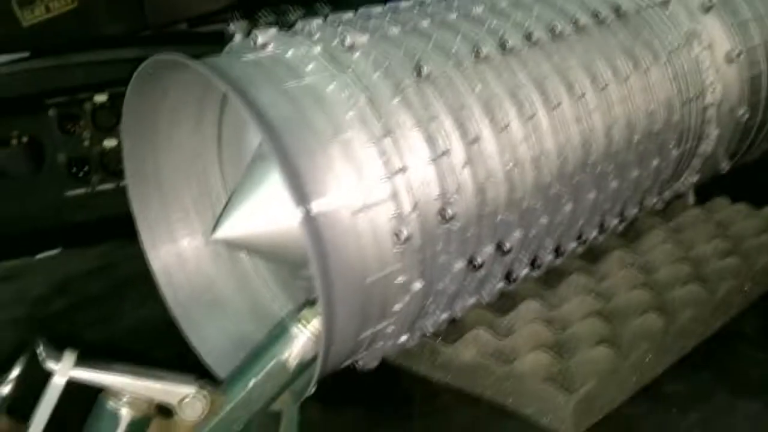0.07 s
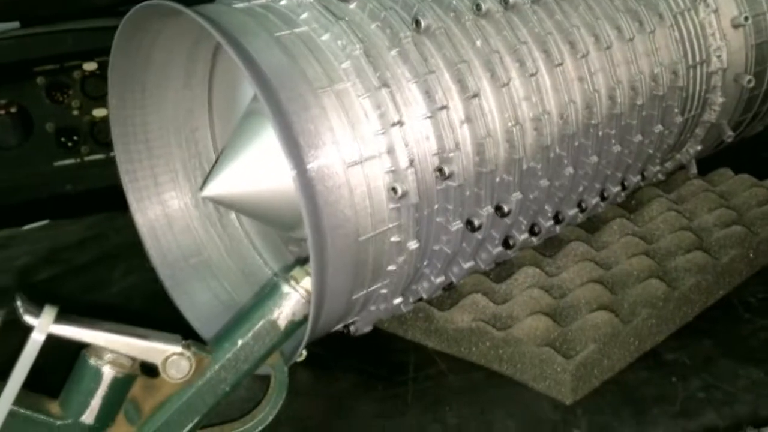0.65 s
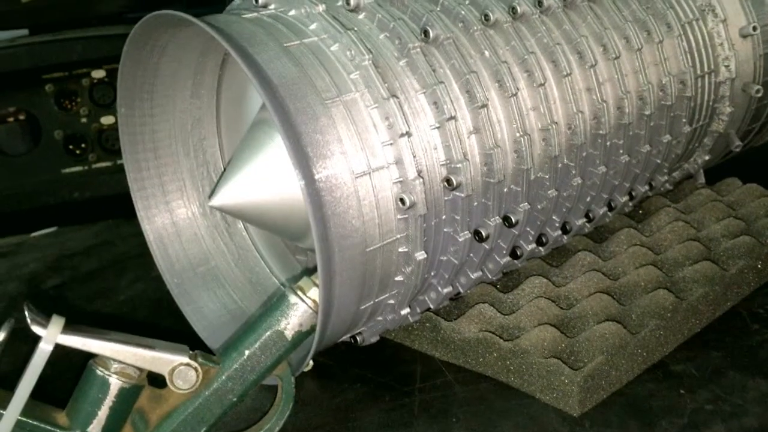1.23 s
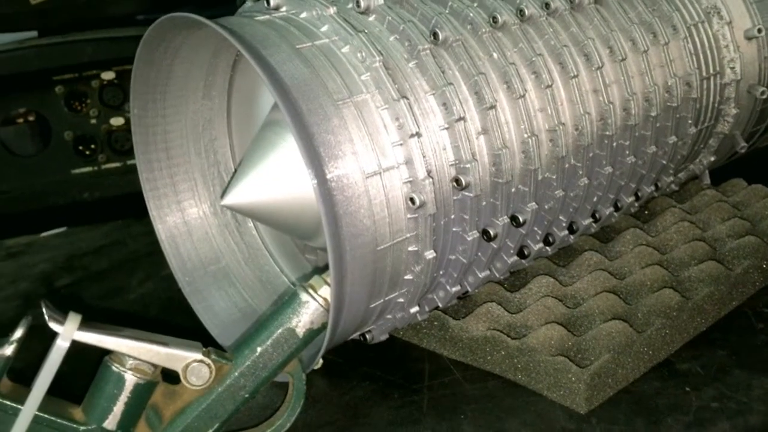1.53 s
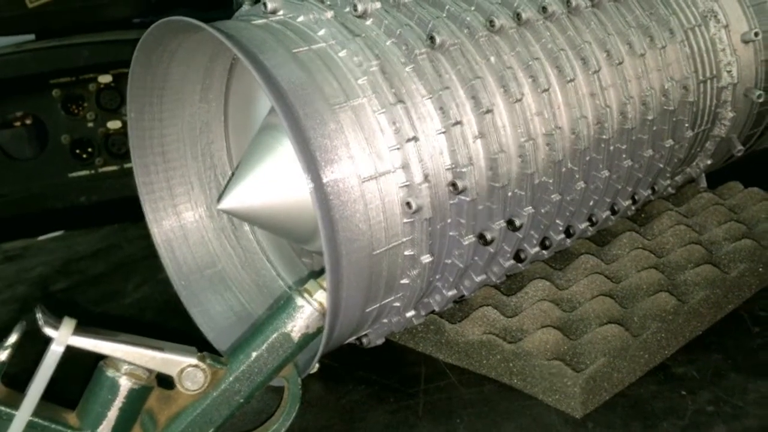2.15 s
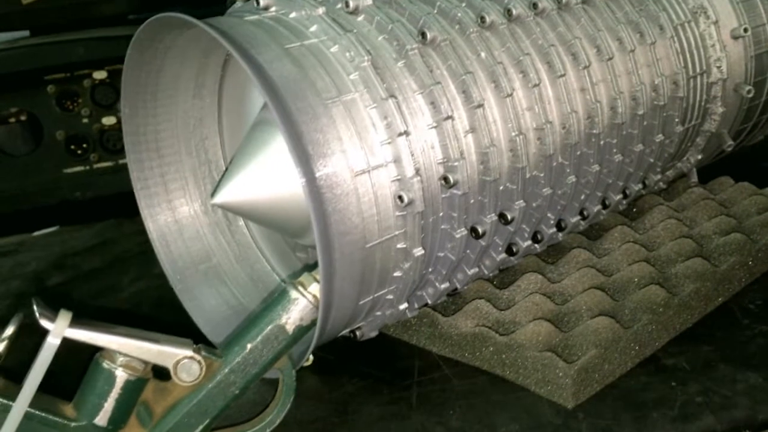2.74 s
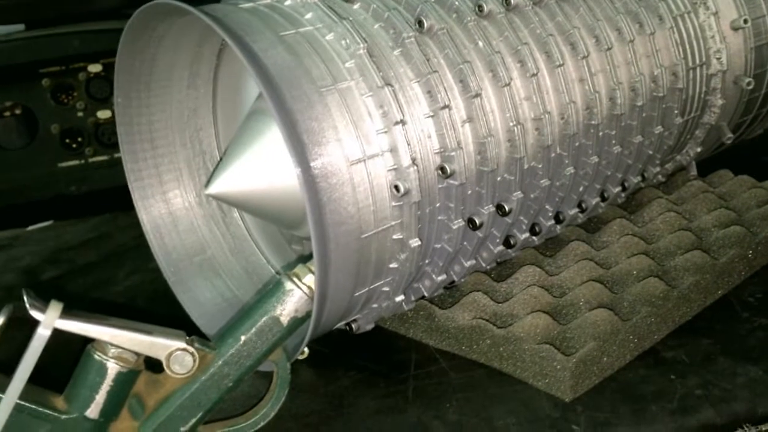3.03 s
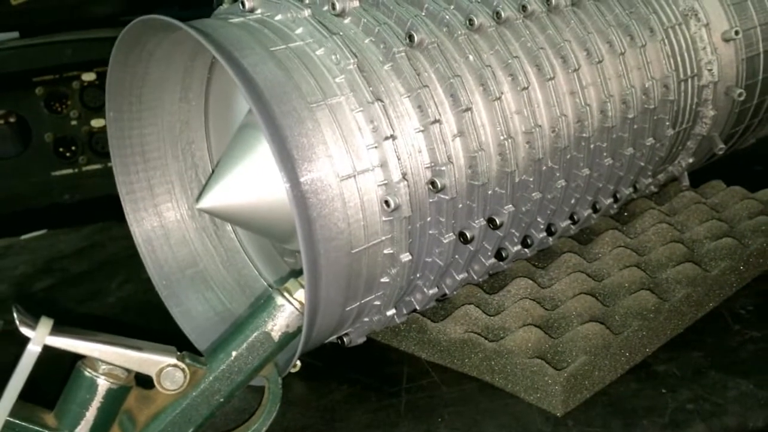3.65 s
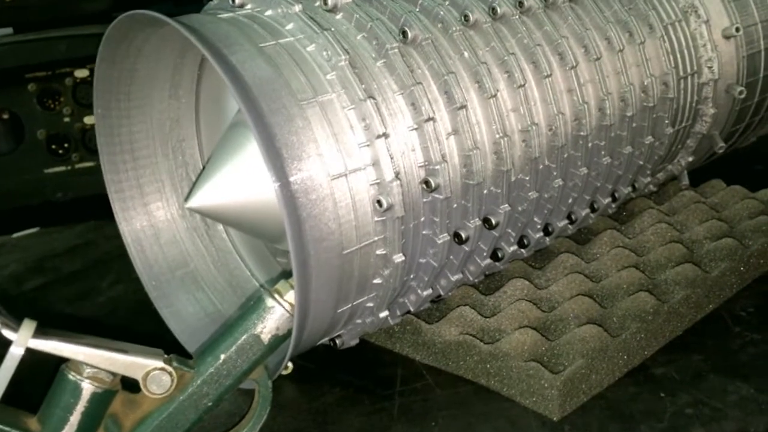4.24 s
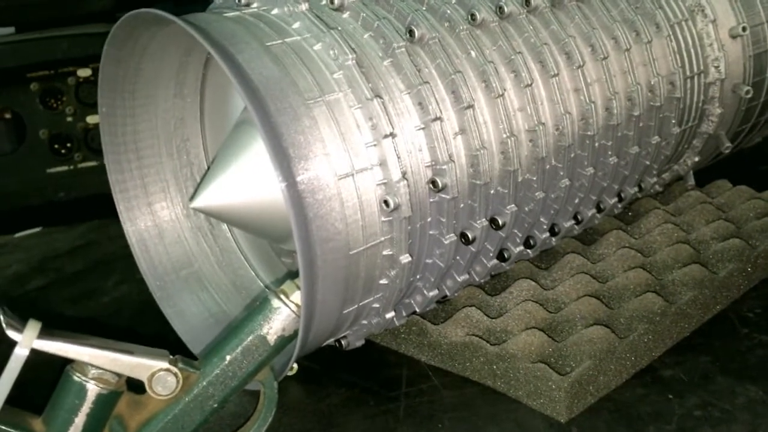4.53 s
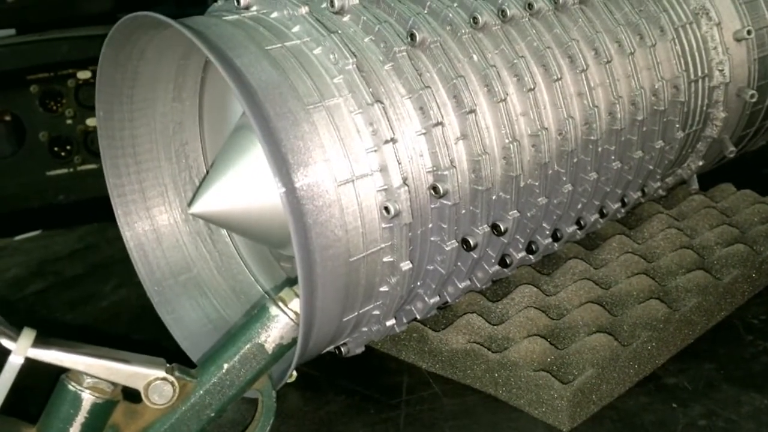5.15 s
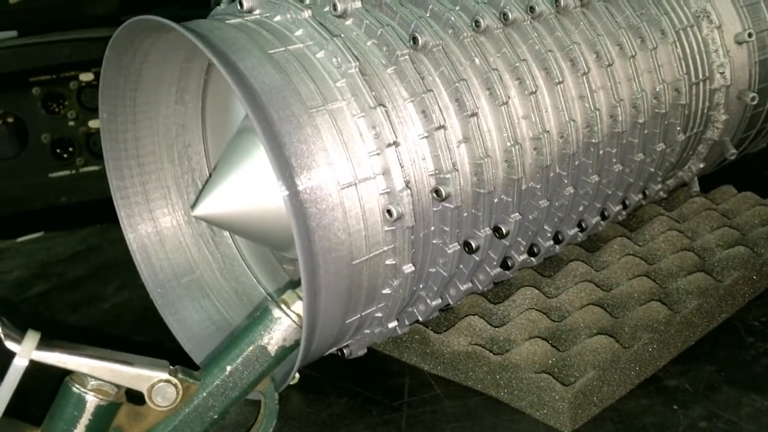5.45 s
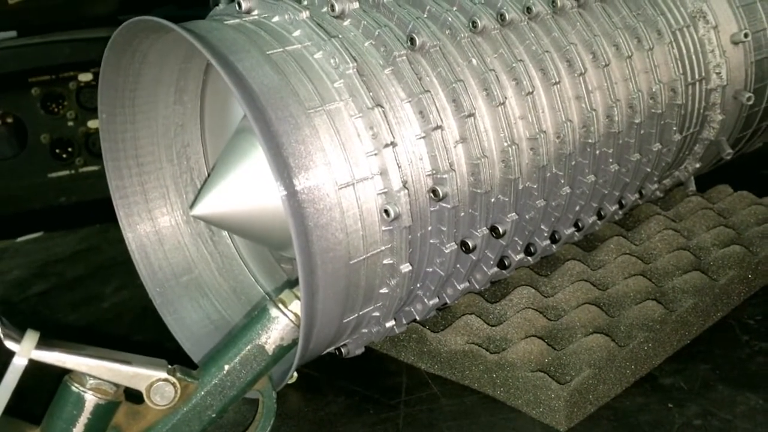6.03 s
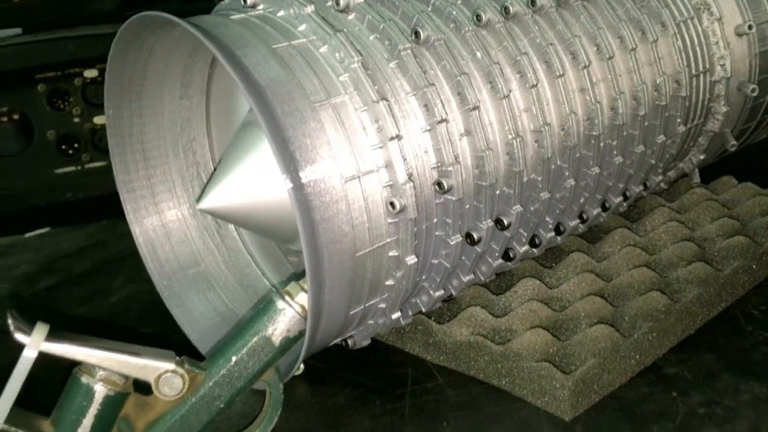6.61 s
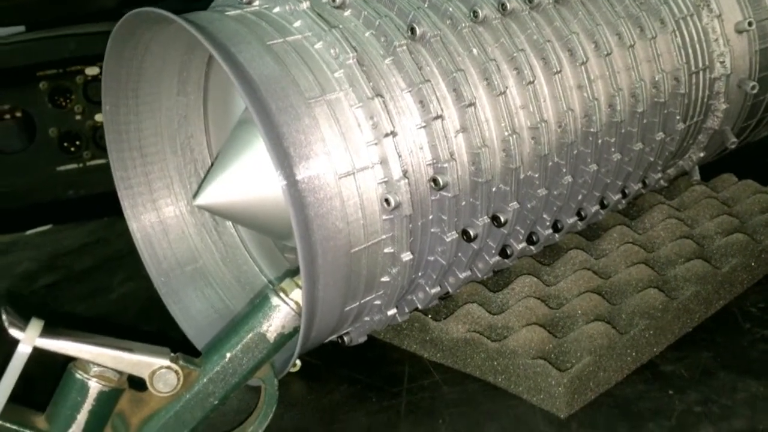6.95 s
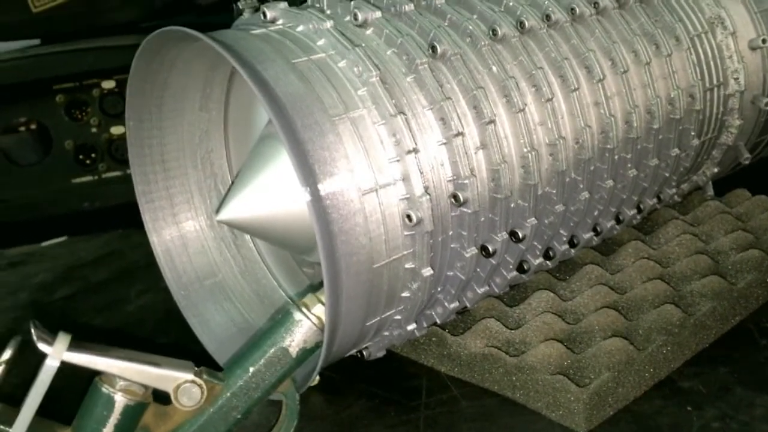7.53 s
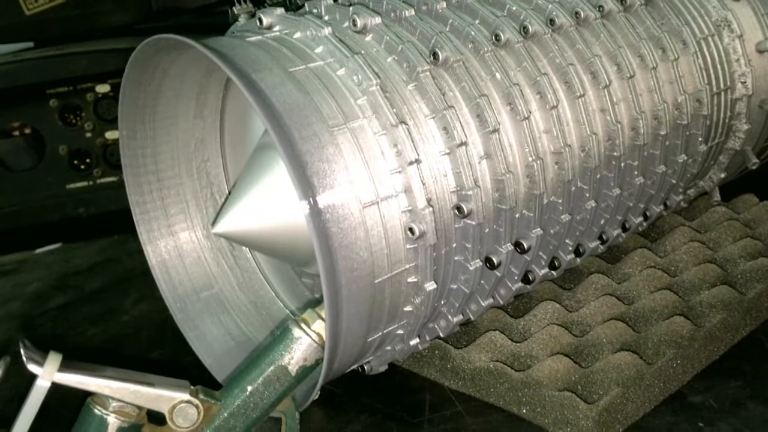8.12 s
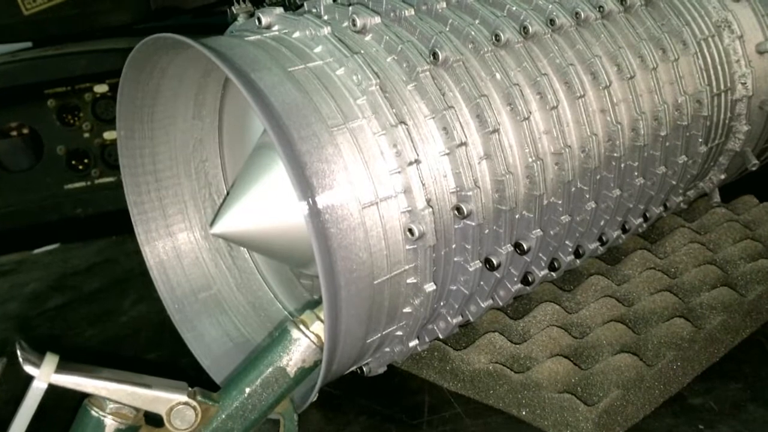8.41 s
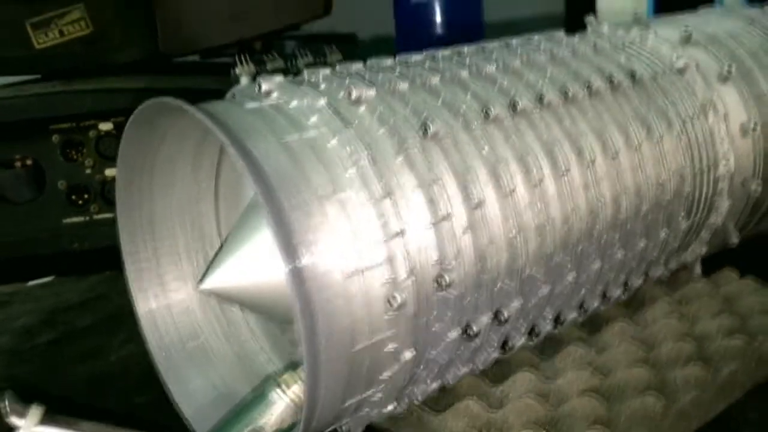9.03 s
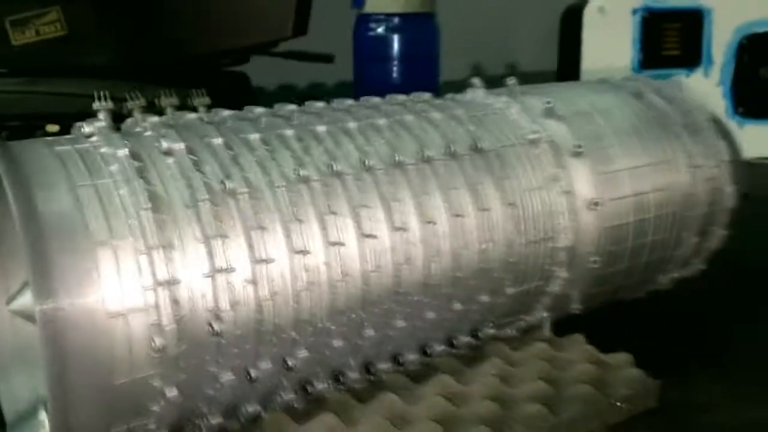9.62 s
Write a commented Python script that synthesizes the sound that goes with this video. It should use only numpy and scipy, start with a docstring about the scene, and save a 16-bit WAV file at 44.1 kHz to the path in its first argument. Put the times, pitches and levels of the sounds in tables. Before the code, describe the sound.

From the start, an air gun hisses brightly and continuously into a small metal turbine, heard close with faint workshop reverberation. The rotor gives a high, slightly rough whine, with thinner overtones swelling and fading. Its pitch holds for a second, rises a little until 3.5 seconds, sags until about 4.8, then climbs steadily, levelling off near the end almost an octave above where it began. Air spilling from the intake buffets the microphone: a few soft pops around 1 second, then a lumpy low roar with dull thumps from 1.5 to 2.5, dying away by 3.5. The buffeting returns with more pops around 5.5 seconds and settles into a stronger, more even roar. At about 9.3 seconds the roar drops away with a last dull pop, and the hiss shifts slightly in colour while the whine carries on to the end, near 10 seconds.

```python
"""A workshop bench: an air gun blows into the intake of a small aluminium turbine.
The rotor's bladed stages whine, rise a little, sag and then climb in pitch; their higher tones swell
as they glide through casing resonances. The jet hisses through the duct, changing colour as the close
microphone swings to the side. Air spilling from the intake buffets it with a lumpy roar and dull pops."""
import sys
import numpy as np
from scipy import signal
from scipy.fft import rfft, irfft
from scipy.io import wavfile

SR = 44100
rng = np.random.default_rng(int(sys.argv[2]) if len(sys.argv) > 2 else 0)


def wav_record(signal):
    """Record a signal, one row per channel, as 16-bit PCM in the file named by sys.argv[1]."""
    frames = np.transpose(np.atleast_2d(signal))
    bounded = np.clip(frames, -1, 1)
    # unit amplitude maps onto the largest positive 16-bit level
    quanta = np.round(bounded * 32767).astype(np.int16)
    wavfile.write(sys.argv[1], SR, quanta)


N = 435266
BLADES = 12   # first stage


def from_db(db):
    """Decibels to gain."""
    return 10 ** (np.asarray(db) / 20)


def unit_rms(x):
    """Scale to unit power."""
    return x / np.sqrt(np.mean(x ** 2) + 1e-20)


def soft_step(x):
    """Smooth rise from 0 to 1 as x passes zero."""
    return .5 + .5 * np.tanh(x / 2)


def curve(rows):
    """Straight lines through (seconds, value) rows, at every sample."""
    return np.interp(np.arange(N) / SR, *np.transpose(rows))


def spline(rows):
    """Natural cubic spline through (seconds, value) rows, at every sample."""
    knots_s, values = np.transpose(rows)

    def terms(t):
        return np.column_stack([np.abs(t[:, None] - knots_s) ** 3, np.ones_like(t), t])

    straight_ends = np.column_stack([[np.ones_like(knots_s), knots_s], np.zeros((2, 2))])
    weights = np.linalg.solve(np.vstack([terms(knots_s), straight_ends]), np.append(values, [0, 0]))
    grid_s = np.linspace(0, N / SR, 2000)
    return np.interp(np.arange(N) / SR, grid_s, terms(grid_s) @ weights)


def drift(rate_hz):
    """Smooth random wander of unit spread."""
    pole = np.exp(-2 * np.pi * rate_hz * 20 / SR)   # one step per 20 samples
    noise = rng.standard_normal(N // 20 + 4002)
    slow = signal.lfilter([1], [1, -2 * pole, pole * pole], noise)[4000:]
    return np.interp(np.arange(N) / 20, np.arange(len(slow)), unit_rms(slow))


def at_hz(rows, hz):
    """Read (Hz, value) rows on a log-frequency axis."""
    knots_hz, values = np.transpose(rows)
    return np.interp(np.log(np.maximum(hz, 1)), np.log(knots_hz), values)


def peaks_db(resonances, hz):
    """Summed gain of bell-shaped peaks and notches."""
    return sum(db / (1 + (2 * (hz - centre) / width) ** 2) for centre, width, db in resonances)


def response(colour, resonances=(), size=4096):
    """Minimum-phase impulse response of a smooth spectrum with peaks and notches."""
    hz = np.arange(size // 2 + 1) * SR / size
    gain = from_db(at_hz(colour, hz) + peaks_db(resonances, hz))
    cepstrum = irfft(np.log(gain))
    cepstrum[1:size // 2] *= 2
    cepstrum[size // 2 + 1:] = 0
    return irfft(np.exp(rfft(cepstrum)))


def through(x, impulse):
    """Convolve, keeping N samples."""
    return signal.fftconvolve(x, impulse)[:N]


def butter(x, hz, kind, order=2):
    """Causal Butterworth filter."""
    return signal.sosfilt(signal.butter(order, hz, kind, fs=SR, output="sos"), x)


def low_shelf(x, db, corner_hz):
    """Raise or lower everything under the corner."""
    return x + (from_db(db) - 1) * butter(x, corner_hz, "low", order=1)


# Rotor speed. Each row: time in seconds, first-stage blade-passing rate in Hz.
BLADE_RATE_HZ = [(0.0, 1067.84), (0.97, 1079.96), (1.91, 1209.28), (2.23, 1275.86), (2.89, 1332.73),
                 (3.54, 1340.09), (4.05, 1275.43), (4.31, 1241.19), (4.82, 1191.22), (6.2, 1372.74),
                 (6.44, 1427.22), (6.71, 1498.66), (8.1, 1765.36), (8.82, 1839.37), (9.02, 1855.47),
                 (9.87, 1902.57)]
# Air spilling from the intake. Each row: time in seconds, relative level in dB.
SPILL_DB = [(0.0, -42), (0.39, -42.5), (1.28, -33.1), (1.66, -23), (2.2, -22), (2.44, -27), (2.59, -32),
            (2.74, -30.5), (3.31, -33.5), (3.76, -44), (4.74, -43), (5.63, -19.0), (5.98, -20),
            (6.13, -18.5), (8.79, -17.5), (9.3, -21.5), (9.51, -30.5), (9.87, -32)]


def airflow(strong_db=-32.5, spread_db=2.5, stall_below_hz=1396, spread_hz=93):
    """The heavy rotor changes speed smoothly; strong spill is ragged in stall, even once up to speed."""
    blade_hz = spline(BLADE_RATE_HZ)
    spill_db = curve(SPILL_DB)
    strong = soft_step((spill_db - strong_db) / spread_db)
    stall = strong * soft_step((stall_below_hz - blade_hz) / spread_hz)
    even = strong - stall
    return blade_hz / BLADES, spill_db, stall, even


def blade_tone(hz, waver, waver_hz=32):
    """A blade row's tone, scattered in level and phase by turbulent air."""
    phase = 2 * np.pi * np.cumsum(hz) / SR + rng.uniform(0, 2 * np.pi)
    in_phase = (1 + waver * drift(waver_hz)) * np.cos(phase)
    quadrature = waver * drift(waver_hz) * np.sin(phase)
    return np.sqrt(2) * (in_phase + quadrature)


# Casing resonances and notches. Each row: centre in Hz, width in Hz, gain in dB.
CASING_PEAKS = [(1590, 485, -20), (1808, 120, 8.5), (2280, 180, 5), (2920, 150, -10.5), (3017, 135, 13),
                (3195, 39, -12), (3520, 200, 8), (3777, 95, 5.5), (4240, 94, 12), (4804, 98, 8),
                (5610, 810, 3.5), (6110, 140, 6), (7640, 110, 10), (9480, 200, 3)]


def casing_tone(hz, level_db, waver, wander_db=0.72, wander_hz=3):
    """A higher blade tone swells and dips as it glides through the casing's resonances."""
    grid_hz = np.arange(0, SR / 2, 5)
    casing_db = np.interp(hz, grid_hz, peaks_db(CASING_PEAKS, grid_hz))
    gain = from_db(level_db + casing_db + wander_db * drift(wander_hz))
    return gain * blade_tone(hz, 1.4 * waver)


# Bite of the jet on the first stage. Each row: time in seconds, relative whine level in dB.
BITE_DB = [(0.0, -24.5), (1.29, -28.5), (1.46, -25.5), (1.81, -33), (2.67, -25.5), (3.3, -30), (4.37, -25),
           (4.57, -29), (4.92, -25), (5.96, -27), (6.22, -33), (6.71, -33.0), (7.36, -25), (7.94, -26.5),
           (8.67, -23.5), (9.87, -25.5)]
# First-stage overtones. Each row: harmonic, relative level in dB, dB gained per dB of deep drive above 0.
FIRST_STAGE_OVERTONES = [(2, -37, 0.24), (3, -44, 0.86), (4, -47.5, 0.2), (5, -49.5, -0.1)]
# Drive of the deeper stages. Each row: time in seconds, gain in dB.
DEEP_DRIVE_DB = [(0.0, 3), (0.7, 3.5), (2.1, -4.2), (3.4, 4.2), (4.2, 6.5), (4.8, 7.5), (5.3, 1.7),
                 (6.2, -10), (9.87, -9.5)]
# Tones of the deeper stages. Each row: cycles per shaft turn, relative level in dB.
DEEP_TONES = [(18, -34.5), (20, -40.5), (22, -42.5), (22.5, -43.5), (23, -43.5), (25, -41), (26, -37),
              (40, -56)]


def rotor(shaft_hz, spill_db, stall, gain_db=2.0, bite_db_per_db=0.44, spill_loss_db_per_db=0.081):
    """Bladed stages whine, locked to one shaft; spill roughens them and weakens the overtones."""
    bite_db, deep_db = curve(BITE_DB), curve(DEEP_DRIVE_DB)
    gust_db = spill_db - spill_db.max()
    waver = 0.145 + 0.08 * np.sqrt(from_db(gust_db)) + 0.08 * stall
    blade_hz = BLADES * shaft_hz
    fundamental = from_db(bite_db) * blade_tone(blade_hz, waver)
    overtones = sum(casing_tone(harmonic * blade_hz, db + slope * np.maximum(deep_db, 0), waver)
                    for harmonic, db, slope in FIRST_STAGE_OVERTONES)
    overtone_db = bite_db_per_db * (bite_db - bite_db.mean()) - spill_loss_db_per_db * gust_db
    deep = sum(casing_tone(per_turn * shaft_hz, db, waver) for per_turn, db in DEEP_TONES)
    return from_db(gain_db) * (fundamental + from_db(overtone_db) * overtones + from_db(deep_db) * deep)


# Workshop decay. Each row: frequency in Hz, time to fall 60 dB in seconds.
ROOM_T60_S = [(300, 1), (1500, 0.92), (8000, 0.043)]


def workshop(x, gain_db=-24):
    """A faint diffuse tail, one second long, that dies sooner in the treble."""
    t = np.arange(SR) / SR
    edges_hz = np.geomspace(200, 12800, 7)
    tail = 0
    for low, high in zip(edges_hz, edges_hz[1:]):
        decay = from_db(-60 * t / at_hz(ROOM_T60_S, np.sqrt(low * high)))
        tail = tail + decay * butter(rng.standard_normal(SR), [low, high], "band")
    return from_db(gain_db) * through(x, tail / np.sqrt(np.sum(tail ** 2)))


# Jet strength. Each row: time in seconds, relative level in dB.
JET_DB = [(0.0, -29), (0.08, -29), (1.4, -29.5), (1.92, -32), (3.41, -29.5), (3.55, -30.5), (5.31, -27.5),
          (6.27, -32.5), (8.6, -32.5), (9.81, -33), (9.87, -30)]
# Jet spectrum. Each row: frequency in Hz, relative density in dB.
JET_SPECTRUM_DB = [(40.0, -9), (90.0, -14), (300.0, -22.5), (700.0, -9), (1200.0, -1.5), (2500.0, 1),
                   (4200.0, 1.3), (6500.0, 2.15), (10000.0, -1), (11500.0, -9), (14000.0, -9.5),
                   (15600.0, -11)]
# Intake duct resonances and notches. Each row: centre in Hz, width in Hz, gain in dB.
DUCT_PEAKS = [(902, 140, 4), (1410, 71, -2), (3320, 160, 1), (3435, 68, 6.5), (4285, 106, 7),
              (5330, 129.5, 0), (5800, 249.6, -2.5), (6150, 200, 4.5), (7190, 280, -13.5), (8540, 130, 3.5),
              (9300, 240, -3), (9160, 235.5, 5), (10120, 450, 6), (11000, 195.8, 6.5), (11100, 383.3, -0.5),
              (11950, 530, 7.5), (12546.5, 222.1, 5.5), (14100, 719.1, 6)]
# Extra peaks and notches at the side. Each row: centre in Hz, width in Hz, gain in dB.
SIDE_PEAKS = [(4300, 430, -2.5), (6400, 770, -6), (8300, 700, 4.5), (10200, 1300, -8), (13400, 1200, 3),
              (14500, 600, -4)]
# Microphone swing. Each row: time in seconds, position from 0 (intake) to 1 (side).
MIC_SWING = [(0, 0.1), (6, 0), (9, 0.43), (9.45, 0.9), (9.87, 1)]


def jet(stall, steady_roar, gain_db=5.0):
    """Hiss coloured by the duct and the microphone's position; fuller in stall."""
    noise = rng.standard_normal(N)
    ahead = unit_rms(through(noise, response(JET_SPECTRUM_DB, DUCT_PEAKS)))
    beside = unit_rms(through(noise, response(JET_SPECTRUM_DB, [*DUCT_PEAKS, *SIDE_PEAKS])))
    swing = curve(MIC_SWING)
    hiss = (1 - swing) * ahead + swing * beside
    lower_band_db = 0.84 + 5 * stall - 2 * steady_roar   # turned down under the steady wind roar
    return from_db(curve(JET_DB) + gain_db) * low_shelf(hiss, lower_band_db, corner_hz=4500)


# Spill on the microphone. Each row: frequency in Hz, relative density in dB.
SPILL_SPECTRUM_DB = [(25, -22), (45, -15.5), (80, -2.5), (140, -1), (240, -2), (330, 0.5), (480, -0.5),
                     (680, -3.5), (1200, -4.5), (2400, -7.5), (4000, -11), (6500, -18.5), (10000, -24.5),
                     (15000, -34.5)]


def buffeting(spill_db, stall, even, lump_db=1.74, lump_hz=110):
    """Small eddies roar on the microphone port; stall adds bass and more patter from larger ones."""
    lumpy_noise = from_db(lump_db * drift(lump_hz)) * rng.standard_normal(N)
    roar = unit_rms(through(lumpy_noise, response(SPILL_SPECTRUM_DB)))
    patter_share = 0.1 + 0.29 * stall
    wind = np.sqrt(1 - patter_share) * roar + np.sqrt(patter_share) * patter()
    bass_db = -0.5 + 8 * stall - 6.5 * even
    return from_db(spill_db + 1.27 - 2 * stall) * low_shelf(wind, bass_db, corner_hz=120)


def eddy(soft_hz=1300, port_hz=60, lag_hz=400):
    """One soft pressure kick whose lows trail its highs; peak 1."""
    kick = butter(response(SPILL_SPECTRUM_DB), soft_hz, "low", order=1)
    kick = butter(kick, port_hz, "high", order=1)
    pole = np.exp(-2 * np.pi * lag_hz / SR)
    for _ in range(2):
        kick = signal.lfilter([-pole, 1], [1, -pole], kick)   # all-pass
    return kick / np.abs(kick).max()


def patter(eddies_per_s=60, spread_db=9, count=2000):
    """Eddies of random size, shed one after another at uneven intervals."""
    gaps_s = rng.uniform(.1, 1.9, count) / eddies_per_s
    sizes = from_db(rng.uniform(-spread_db, spread_db, count)) * rng.choice([-1, 1], count)
    starts = (np.cumsum(gaps_s) * SR).astype(int)
    hits = np.zeros(N)
    hits[starts[starts < N]] = sizes[starts < N]
    return unit_rms(through(hits, eddy()))


# Biggest eddies. Each row: start in seconds, relative peak in dB.
POP_PEAKS_DB = [(0.701, -20), (.995, -16), (1.199, -18), (1.363, -17), (1.538, -2.5), (1.571, -6.5),
                (1.627, -11), (1.663, -8), (1.720, -6), (1.793, -7), (1.865, -6), (1.875, -5), (1.929, -5),
                (2.048, -6), (2.247, -8), (2.423, -7), (2.755, -10.5), (2.915, -12.5), (5.451, -4),
                (5.480, -3.5), (5.512, -5.5), (5.639, -8), (5.73, -5), (8.730, -7), (9.406, -10)]


def pops(gain_db=-2.0):
    """The biggest eddies hit the microphone port and thump out of the roar."""
    hits = np.zeros(N)
    for start_s, db in POP_PEAKS_DB:
        hits[round(start_s * SR)] = from_db(db + gain_db) * rng.choice([-1, 1])
    return through(hits, eddy())


def scene():
    """Whine with its faint room, hiss, buffeting and pops, at one microphone."""
    shaft_hz, spill_db, stall, even = airflow()
    whine = rotor(shaft_hz, spill_db, stall)
    mono = whine + workshop(whine) + jet(stall, even) + buffeting(spill_db, stall, even) + pops()
    return np.array([mono, mono])


def record(dry, bass_cut_hz=45, ceiling=0.85, top_cut_hz=15800):
    """The microphone drops the deep bass and rounds the highest peaks; the top is cut steeply."""
    sound = butter(dry, bass_cut_hz, "high")
    rounded = sound / (1 + (sound / ceiling) ** 4) ** .25
    top_cut = signal.ellip(12, .1, 90, top_cut_hz, fs=SR, output="sos")
    return signal.sosfilt(top_cut, rounded)


dry = scene()
out = record(dry)
wav_record(out)
```